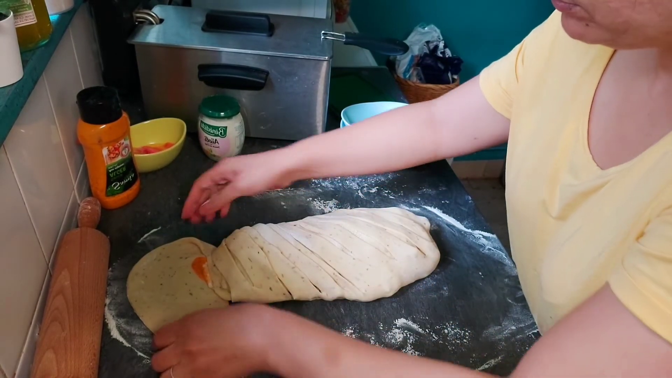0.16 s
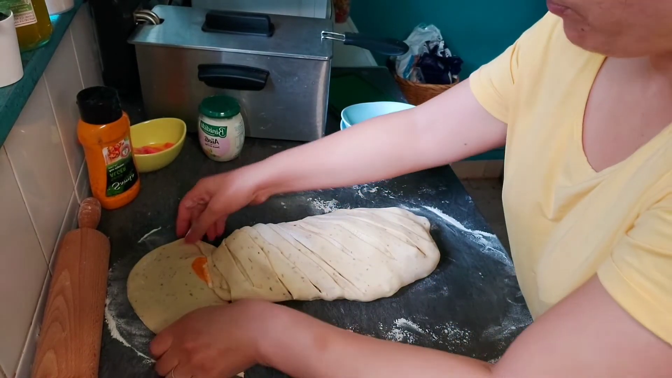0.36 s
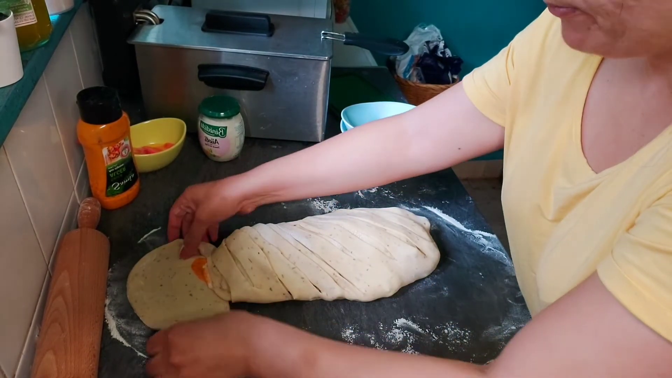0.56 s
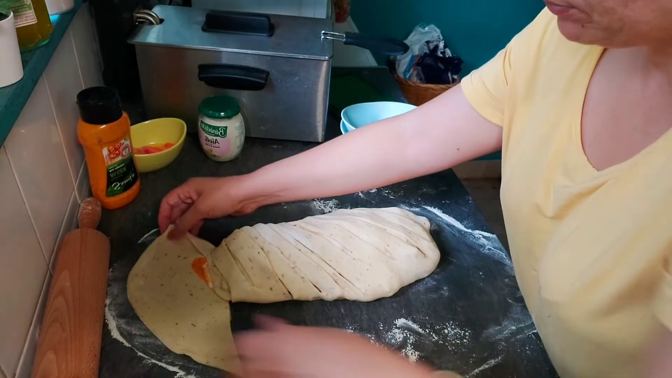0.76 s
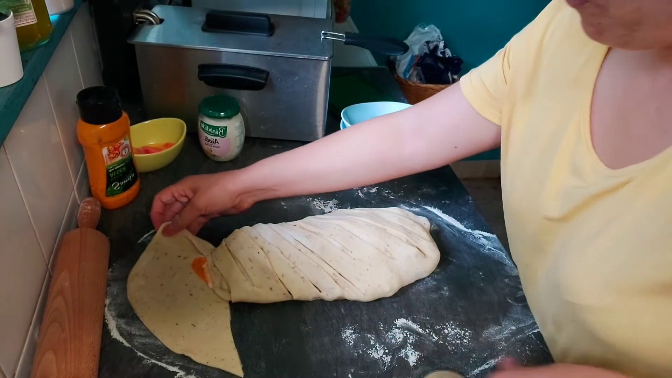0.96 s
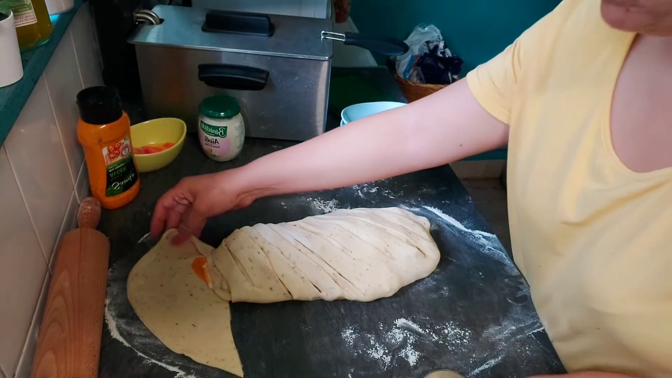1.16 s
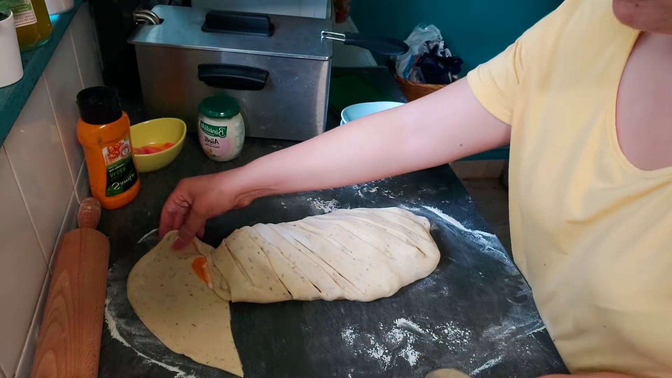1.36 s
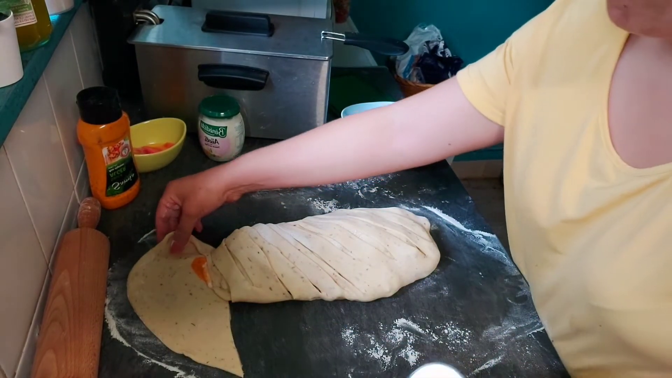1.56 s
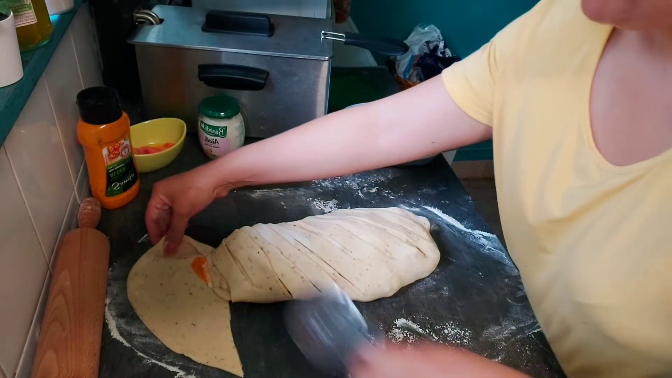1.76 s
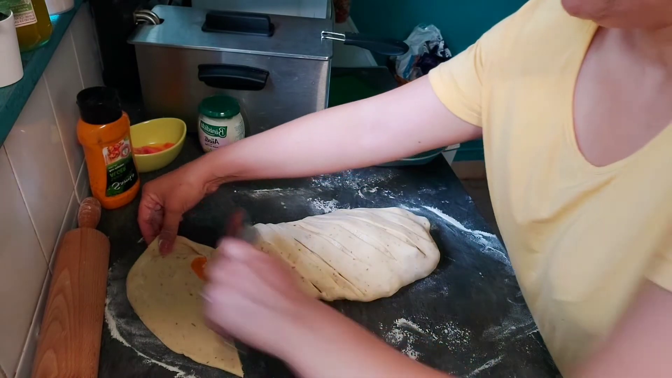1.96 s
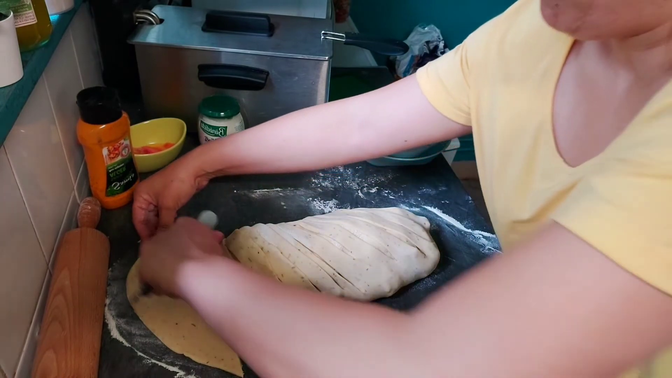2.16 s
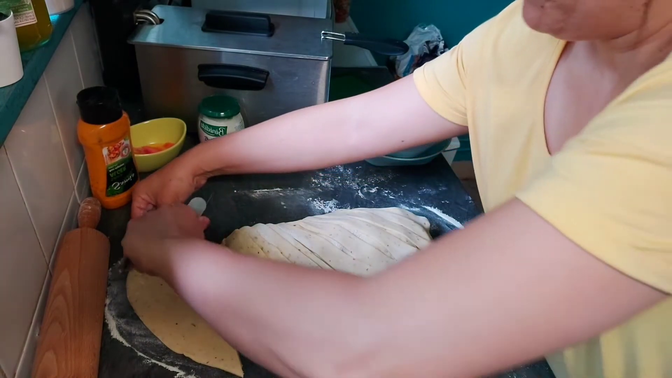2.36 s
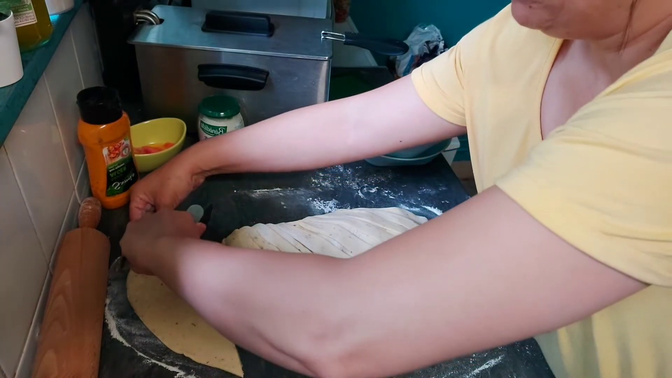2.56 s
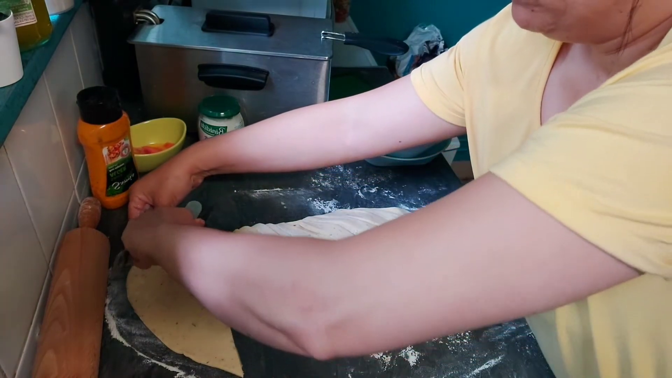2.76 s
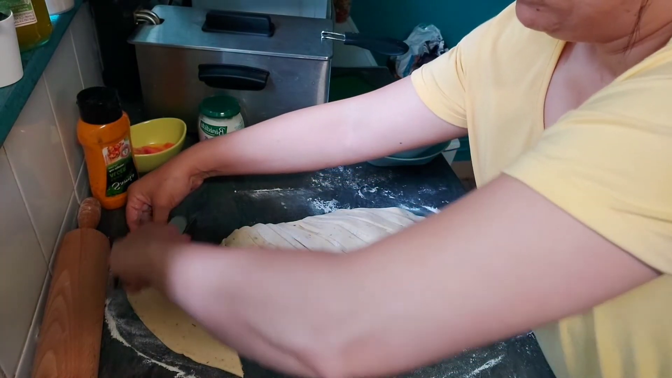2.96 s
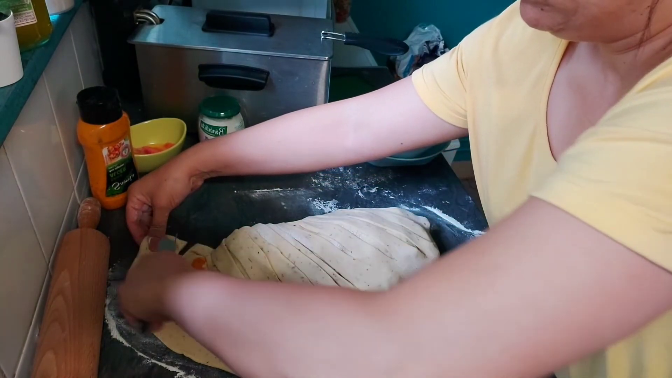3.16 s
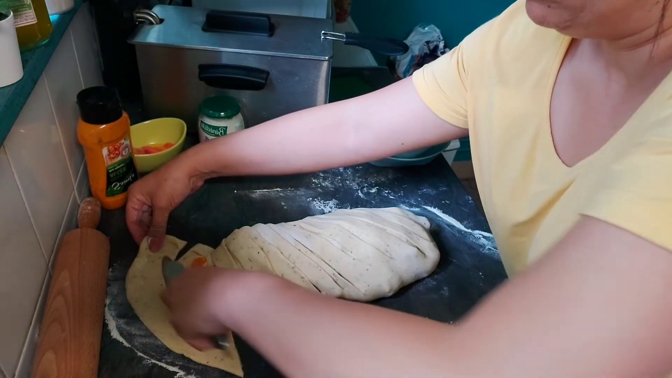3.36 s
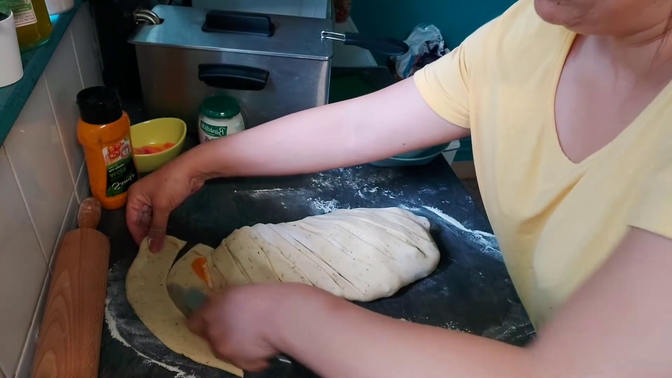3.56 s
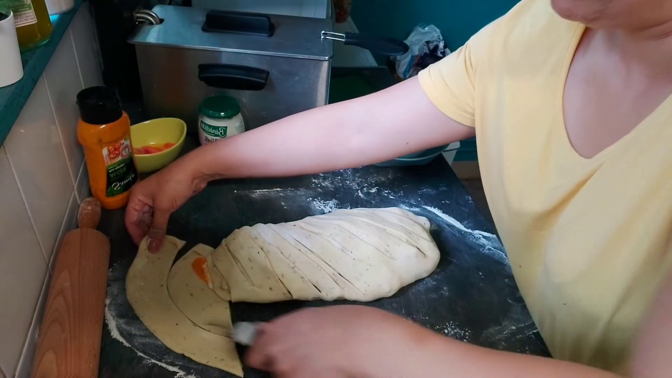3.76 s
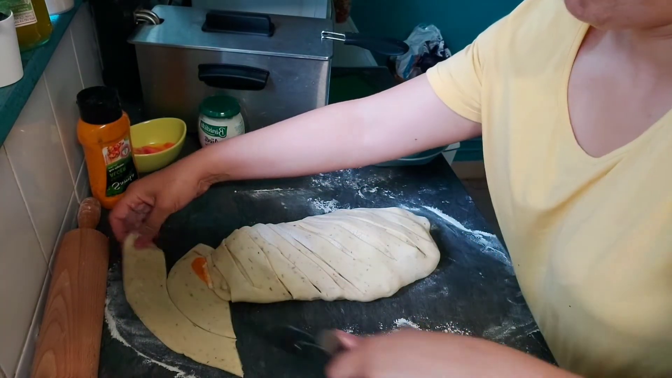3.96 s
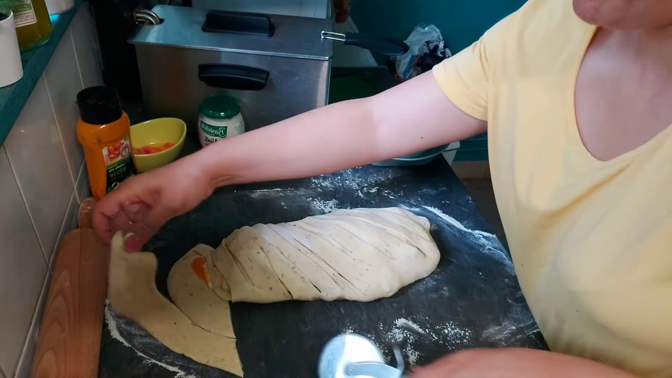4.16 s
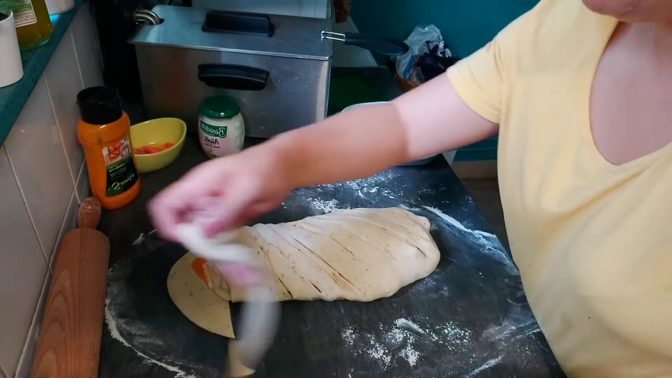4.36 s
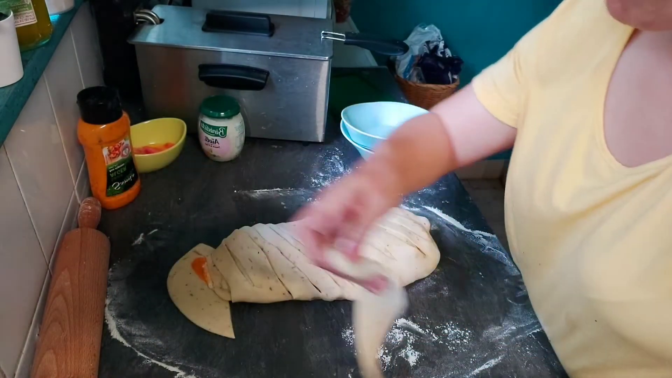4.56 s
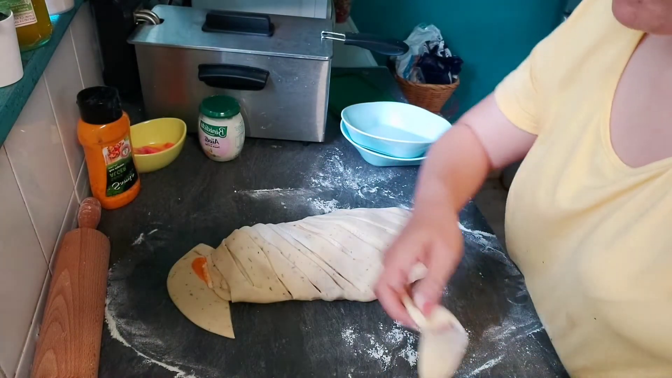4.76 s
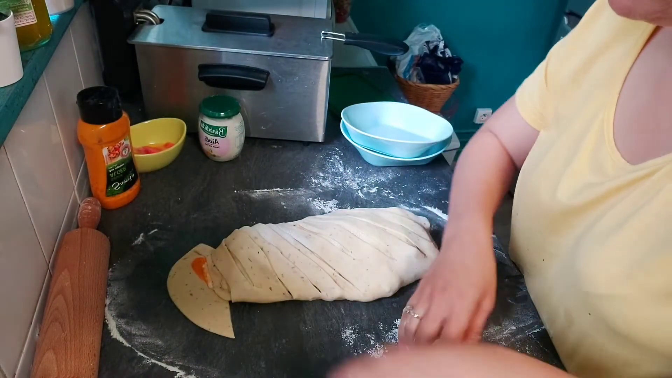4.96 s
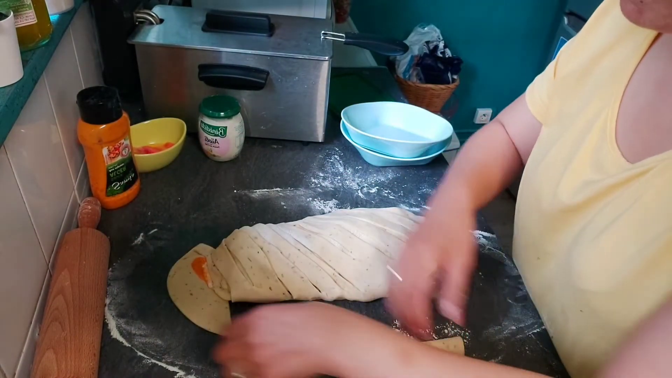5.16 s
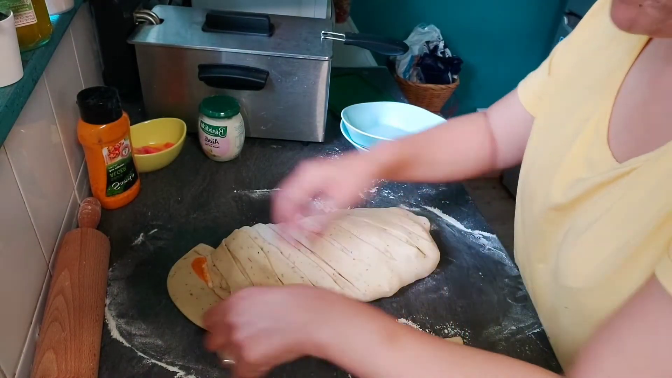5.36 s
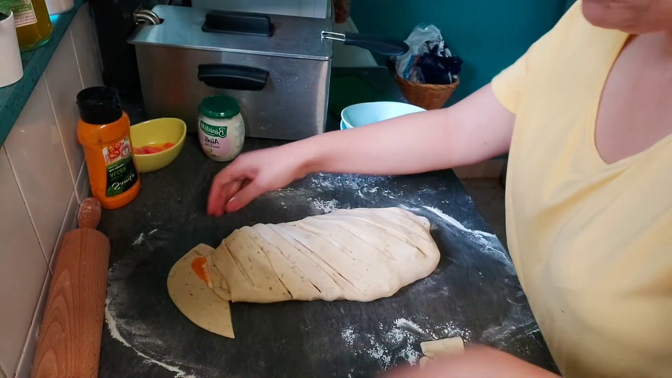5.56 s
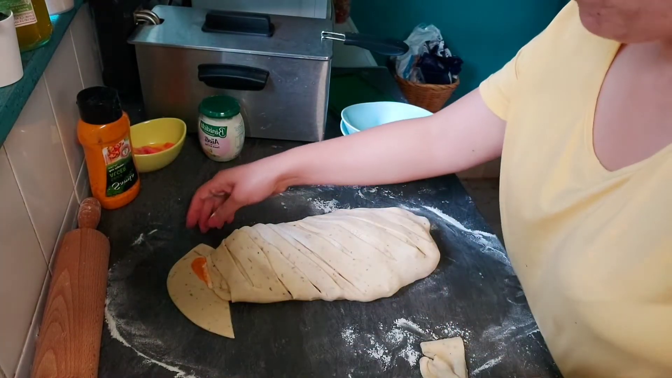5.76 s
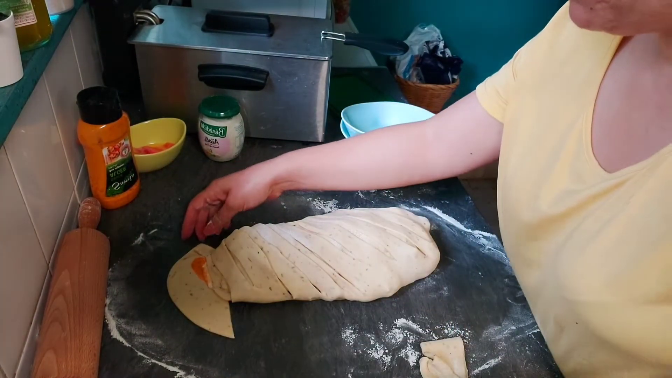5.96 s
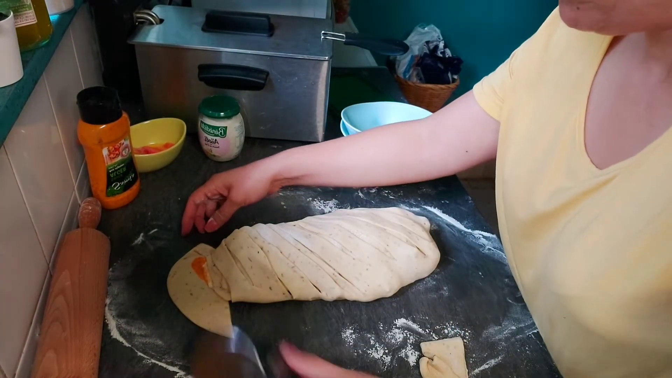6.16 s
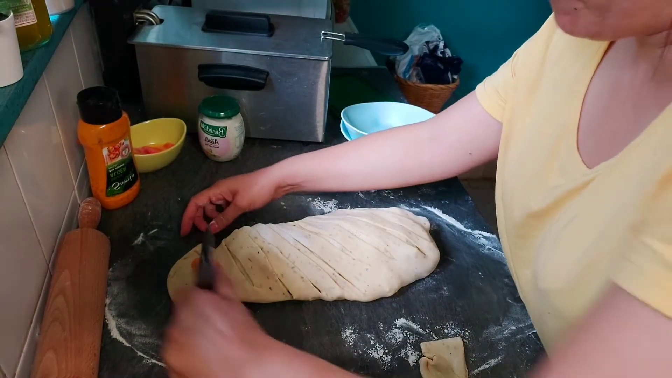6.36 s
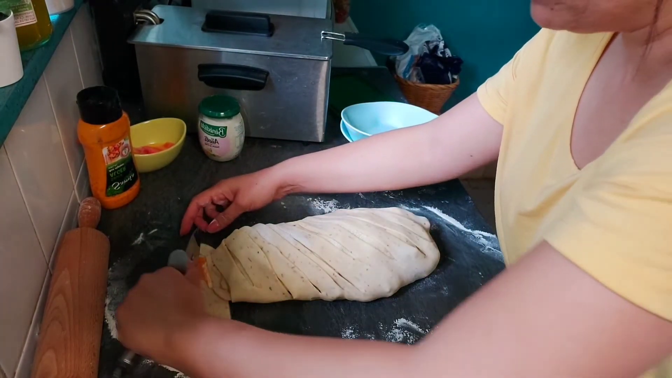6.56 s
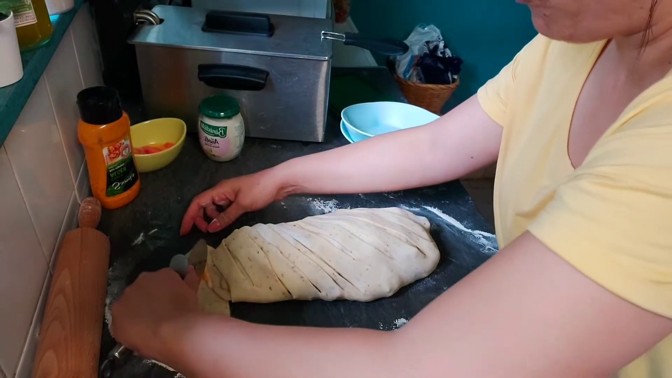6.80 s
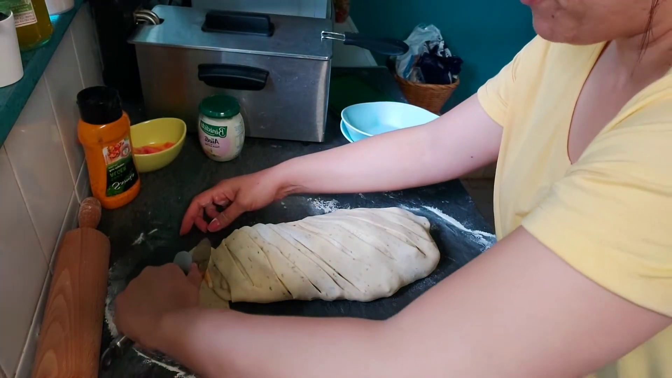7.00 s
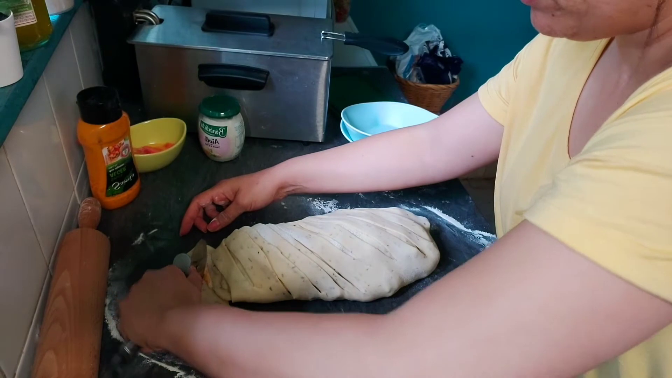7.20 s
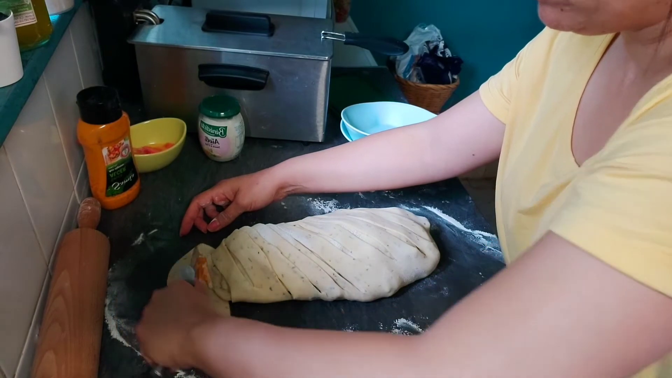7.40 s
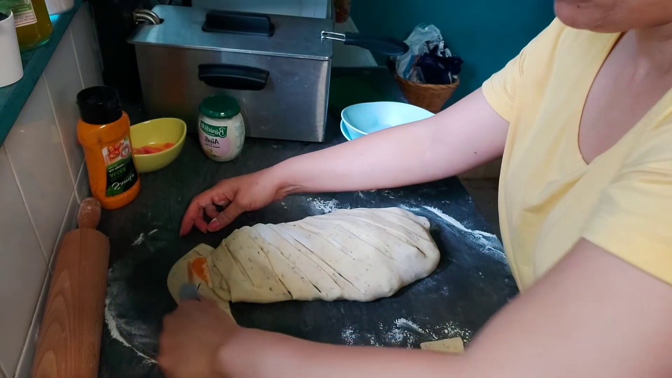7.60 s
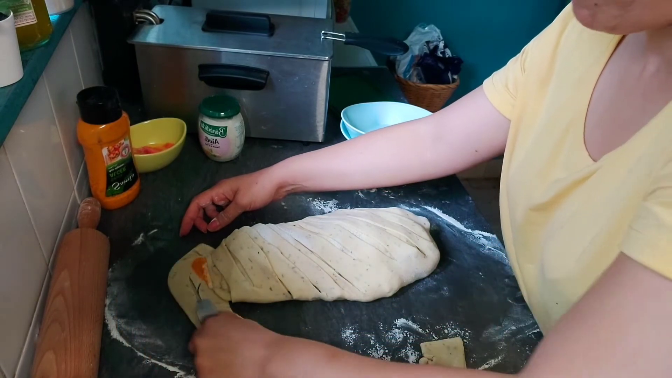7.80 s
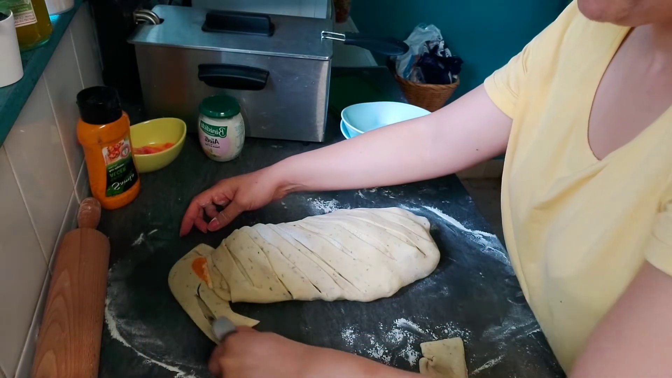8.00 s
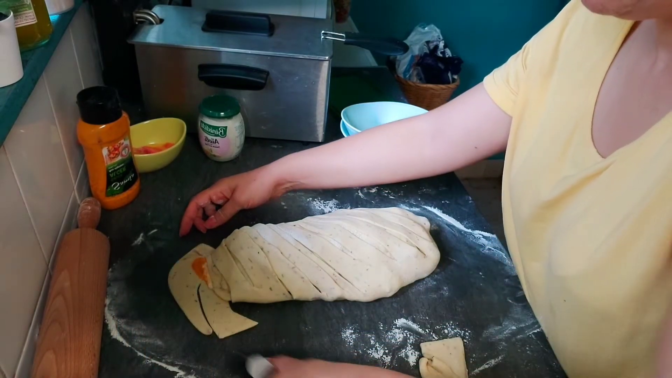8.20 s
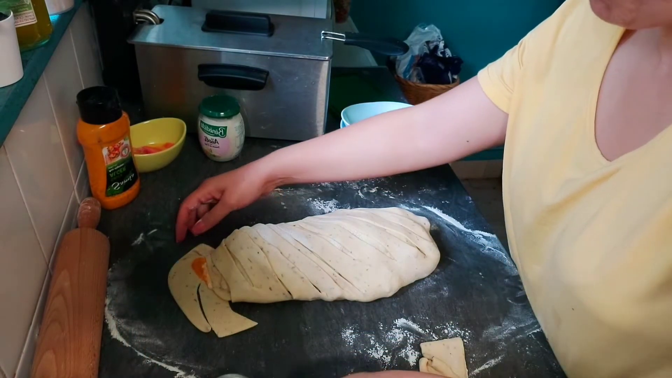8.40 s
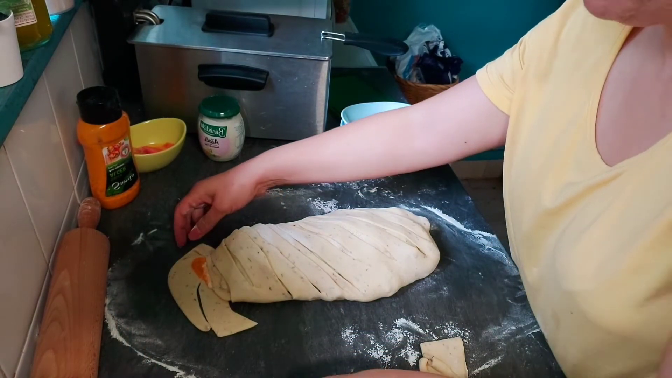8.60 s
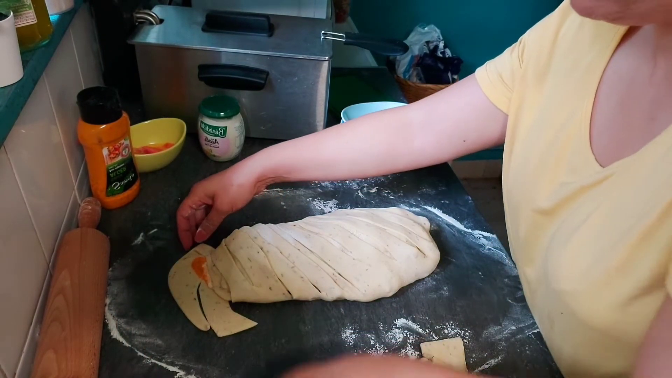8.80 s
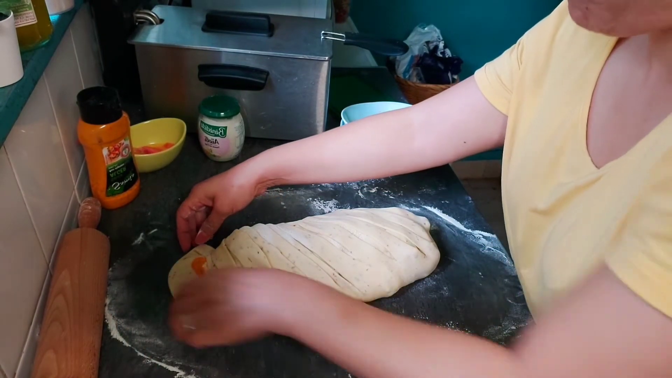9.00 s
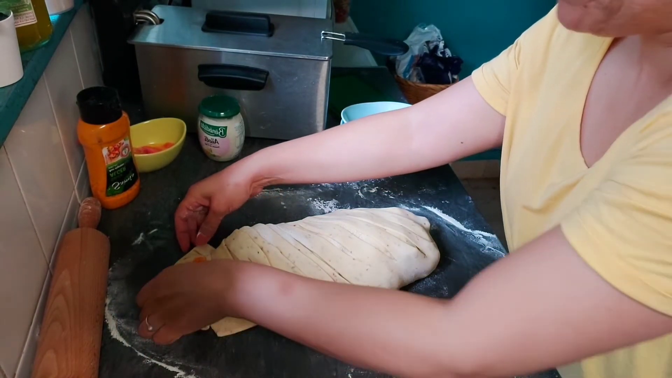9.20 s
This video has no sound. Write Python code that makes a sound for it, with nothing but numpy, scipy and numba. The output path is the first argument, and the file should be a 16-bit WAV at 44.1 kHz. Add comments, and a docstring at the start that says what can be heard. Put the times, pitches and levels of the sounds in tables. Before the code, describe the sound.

Close, hard metal knocks, light clinks and short rough rolling scrapes of a dough cutter on stone, over faint quick ticking and quiet kitchen hum.

```python
"""Cutting wheel in a tiled kitchen

A steel cutting wheel is picked up, rolled through dough and dropped on a stone counter in a small tiled kitchen.
Each contact is a burst of noise for the crack, and sets decaying tones going for the blade and the counter.
Rolling is rough noise in a sinking band; the loose disc chimes, and hard knocks thump in the cabinet below.
Far off, short fading puffs of noise make the ticks of a timer over a steady hum and hiss.
"""
import sys
import numpy as np
from scipy import signal
from scipy.fft import rfft, irfft, next_fast_len
from scipy.io import wavfile
from scipy.ndimage import uniform_filter1d
from numba import njit

SR = 44100
rng = np.random.default_rng(int(sys.argv[2]) if len(sys.argv) > 2 else 0)


def generate_wav(sig):
    """Save sig (samples, or channels by samples) to the path in sys.argv[1] as 16-bit PCM at SR."""
    pcm = np.round(np.clip(np.atleast_2d(sig).T, -1, 1) * 32767).astype(np.int16)
    wavfile.write(sys.argv[1], SR, pcm)


def ratio_of_db(decibels):
    """Turn decibels (scalar or array-like) into linear amplitude factors; 0 dB maps to 1."""
    return 10 ** (np.asarray(decibels, float) / 20)


N = 407660  # length in samples

# Spectrum of hum and hiss. Each row: frequency in Hz, relative level in dB per Hz.
HUM_SPECTRUM = [(30, -1), (95, 7), (182, -14.5), (332, -8), (673, -20), (1050, -19.5), (1085, -7),
                (1120, -14.5), (1400, -24), (3230, -30.5), (7260, -27.5), (10200, -38), (15500, -35)]
HUM_DB = -63  # rms

# Spectrum of a timer tick. Each row: frequency in Hz, relative level in dB per Hz.
TICK_SPECTRUM = [(2500, -22), (4200, -2), (7300, -0.5), (9500, -14.5), (12000, -47.5)]
TICK_FIRST_S, TICK_PERIOD_S = .122, .2716
TICK_NOISE_DB = -65  # rms of the noise from which the ticks are cut

# How long the room echoes. Each row: frequency in Hz, time to fade by 60 dB in seconds.
ROOM_T60 = [(100, 0.36), (12800, 0.33)]
ROOM_DB, EARLY_DB = 5, -0.5  # echoes over the direct sound; extra strength of the early ones
RIGHT_LAG_S, LEFT_DB = 0.0002357, -1.95  # average delay at the right port; left level over right
PATTERNS, PATTERN_S = 5, .23  # number of random echo patterns, seconds from one to the next

# Tones of the cabinet under the slab. Each row: frequency in Hz, relative level in dB, 60 dB fade time in seconds.
CABINET = [(52, 0, .45), (78, -6, .3)]
SHAKE_DB = -38  # drive of the cabinet for a thud of -13 dB

# Tones of the free disc, with 2, 3, .. nodal diameters: frequency in Hz.
DISC_HZ = [2498, 4294, 6492, 9071, 12005, 15290]
# The same tones in order. Each row: relative level in dB, 60 dB fade time in seconds.
DISC = [(-10.5, 3.9), (-5.5, 2.04), (-1.5, 1.4), (-5, 1.3), (0, 0.89), (-4.5, .3)]
# Blows on the disc's rim. Each row: start in seconds, level in dB, tilt in dB per octave,
# angle from the microphone in degrees.
CHIMES = [(1.573, -63, -13.5, 4), (1.884, -53.5, -0.5, 4), (2.102, -51.5, 4, 3.4), (4.795, -44.5, -1.5, 5),
          (5.992, -42, 2.5, 4.4), (8.8, -44.5, -8.5, 35), (9.116, -45.5, 10.5, 72)]
# Touches that stop the disc: time in seconds.
STOPS_S = [1.8, 2.05, 2.44, 5.85, 6.19, 9.3]

# Tones of the blade: frequency in Hz.
BLADE_HZ = [3912, 6702, 6795, 7350, 7475, 7654, 10150, 11330, 11465, 13980]
# The same tones in order. Each row: level in dB when lifted, level in dB when it meets the stone,
# 60 dB fade time in seconds.
BLADE = [(-10, -14.5, 0.21), (-12, -19.5, 0.41), (-9.5, -14, .28), (-22, -13, 0.02), (-31.5, -8.5, 0.087),
         (-19, -12, 0.066), (-10.5, -18, 0.17), (-12, -4.5, 0.074), (-11.5, -5.5, 0.28),
         (-11.5, -20.5, .14)]
# Tones of the stone counter. Each row: frequency in Hz, relative level in dB, 60 dB fade time in seconds.
COUNTER = [(126.8, -19.5, 0.39), (202, -19.5, 0.3), (288.4, -3.5, 0.097), (397.1, -5.5, 0.024),
           (611, -6, 0.027), (714, -15, 0.086), (1015, 9, 0.0022), (1357, -11, 0.044)]

# Spectrum of the crack of a contact. Each row: frequency in Hz, relative level in dB per Hz.
CRACK_SPECTRUM = [(300, -46), (1200, -18), (1650, -0.5), (3500, -0.5), (5400, -1), (6150, -6), (7000, -5.5),
                  (9500, -10.5), (11450, 5), (12600, -6), (14000, -18.5), (16000, -26.5)]
# Knocks of the wheel on the counter. Each row: start in seconds, crack level in dB, thud level in dB,
# crack tilt in dB per octave, blade ring in dB over the crack.
KNOCKS = [(1.24, -26.5, -24, -1, -26.5), (1.2588, -31, -21, -2.5, -14.5), (1.382, -19, -27.5, 0.5, -7.5),
          (1.392, -13.5, -20.5, 2, -21), (1.4822, -25.5, -25.5, -3.5, -6), (1.5205, -22, -26, 2, -31),
          (3.5281, -26.5, -26, 2, -12), (3.545, -29.5, -32, 22, -31), (3.721, -34.5, -45.5, 0.5, -22),
          (4.3779, -27, -29.5, -5, 1), (4.397, -9.5, -20, -1.5, -9.5), (4.403, -9.5, -18.5, 7.5, 3),
          (4.474, -12, -13.5, -10.5, -26.5), (4.6536, -14, -20.5, 3, -0.5), (4.757, -20.5, -23.5, 4, -0.5),
          (4.795, -16, -7.5, 1, -1.5), (4.813, -15.5, -16, 1, 3), (5.7512, -24, -20, -3.5, -3),
          (5.8237, -31.5, -26.5, -4, -16.5), (5.851, -12.5, -17, 1.5, -7), (5.868, -13, -17, 2.5, -7.5),
          (5.955, -43, -30.5, -10.5, -12), (5.9895, -21, -39.5, 2.5, -4.5), (8.167, -19.5, -22, 1, -18.5),
          (8.591, -4.5, -12, 3, -7), (8.68, -16.5, -18, 1.5, -4.5), (8.7057, -15.5, -22.5, 2, -23),
          (8.745, -24.5, -22.5, 1, -4), (8.799, -13, -10.5, 14, -5), (9.08, -50, -34.5, -25, -13.5),
          (9.1152, -16, -21.5, 3.5, -11.5)]
# Clinks of the lifted wheel on its axle. Each row: start in seconds, crack level in dB,
# crack tilt in dB per octave, blade ring in dB over the crack.
CLINKS = [(1.505, -34, 9, 1.5), (1.5722, -20, 5, -2), (1.7943, -22.5, 5, -5.5), (1.8755, -37.5, 3.5, 8),
          (2.037, -31, 5, -34), (2.1, -30, 8.5, -6.5), (2.603, -40.5, -4, -32), (3.8012, -26.5, 2.5, -26),
          (3.9564, -42.5, 1.5, -23), (3.9986, -39.5, 1.5, -10.5), (4.25, -53.5, -2, -18),
          (4.357, -40.5, -4, -13), (6.0178, -23, 6, -3.5), (6.2317, -39, -10, 13), (6.258, -26.5, 3, -1.5),
          (6.342, -25, 0.5, 5), (6.425, -34, 2, -19), (8.19, -23.5, 9, -6.5), (8.3595, -37.5, 1, -6),
          (8.4133, -24.5, 0.5, 6.5), (8.524, -24.5, 2.5, -4), (8.82, -13.5, 3, -29)]
RATTLE_MS, DB_PER_HALVING = 4.22, 51.5  # decay time of a -20 dB crack; this much harder halves it
BUMP_DB, BUMP_OCT = 2.5, .4  # size and spacing of random bumps in a crack's spectrum

# Strokes of rolling and sliding. Each row: first centre of the rumble in Hz, then the pressure curve
# as pairs of time in seconds and relative rumble level in dB.
ROLL = [(470, [(.2, -79), (.31, -55.5), (.4, -54), (.5, -104)]), (650, [(.93, -73), (1.0, -58.5),
        (1.07, -86.5)]), (800, [(2.585, -53), (2.6, -42.5), (2.65, -36), (2.715, -48), (2.755, -47),
        (2.82, -100)]), (329, [(3.02, -64.5), (3.05, -53), (3.1, -99)]), (666, [(3.22, -67), (3.5, -57),
        (3.56, -40.5), (3.7, -49.5), (3.74, -34.5)]), (315, [(3.74, -47), (3.79, -32.5), (3.85, -78)]),
        (390, [(5.55, -72), (5.58, -45), (5.61, -80), (5.65, -47), (5.7, -48), (5.75, -38.5)]),
        (926, [(7.28, -72.5), (7.36, -54), (7.58, -44.5), (7.8, -52), (7.9, -44.5), (7.97, -56),
        (8.01, -42.5), (8.12, -34.5), (8.17, -27), (8.22, -47.5), (8.32, -94.5)])]
SINK_OCT_PER_S, GRIT_DB = 1.5, -12.5  # sinking of the rumble along a stroke; grit under the roughness


def level(x, db):
    """Scale to an rms level."""
    return x * ratio_of_db(db) / np.sqrt(np.mean(x ** 2))


def on_log_hz(hz, table):
    """Read a (Hz, value) table on a log-frequency axis."""
    table_hz, value = np.transpose(table)
    return np.interp(np.log(hz + 1), np.log(table_hz), value)


def colour(x, table):
    """Give noise a spectrum of (Hz, dB) points."""
    n = x.shape[-1]
    gain = ratio_of_db(on_log_hz(np.fft.rfftfreq(n, 1 / SR), table))
    return irfft(rfft(x) * gain, n)


def grit(scatter_db):
    """Dense clicks of uneven size, rms 1."""
    size = ratio_of_db(scatter_db * rng.exponential(size=N))
    return level(rng.standard_normal(N) * size, 0)


@njit
def moving_band(x, hz, share):
    """State-variable band-pass with a moving centre; share = width / centre."""
    y, b, l = np.empty(len(x)), 0., 0.
    for i in range(len(x)):
        g = np.tan(np.pi * hz[i] / SR)
        v = (b + g * (x[i] - l)) / (1 + g * (g + share))
        b, l, y[i] = 2 * v - b, l + 2 * g * v, share * v
    return y


@njit
def mode(x, gain, pole, which):
    """One decaying tone, a turning and shrinking pointer whose gain and pole change from contact to contact."""
    y, z = np.empty(len(x)), 0j
    for i in range(len(x)):
        z = z * pole[which[i]] + gain[which[i]] * x[i] + 1e-18
        y[i] = z.imag
    return y


def ring(x, modes, spot, detune, which):
    """Sum of modes; spot and detune give each mode a gain and pitch factor per contact, which names the contact."""
    total = 0
    for (hz, db, t60), gain, pitch in zip(modes, spot, detune):
        pole = np.exp((2j * np.pi * hz * pitch - np.log(1000) / t60) / SR)
        total = total + mode(x, ratio_of_db(db) * gain, pole, which)
    return total


def hum():
    """Appliance hum and microphone hiss as shaped noise; the bass is nearly the same left and right."""
    mid, side = colour(rng.standard_normal((2, N)), HUM_SPECTRUM)
    side = colour(side, [(100, -15.5), (400, -2.5), (1000, 0.5)])
    return level(mid + side * np.array([[1], [-1]]), HUM_DB)


def timer():
    """Regular soft ticks from across the kitchen, each a fading puff of noise like an echo."""
    beats = np.zeros(N)
    at = (np.arange(TICK_FIRST_S, N / SR, TICK_PERIOD_S) * SR).astype(int)
    beats[at] = ratio_of_db(1.5 * rng.standard_normal(len(at)))  # uneven strength
    fade = signal.lfilter([1], [1, -np.exp(-1 / (.04 * SR))], beats)  # decay time .04 s
    return fade * level(colour(rng.standard_normal((2, N)), TICK_SPECTRUM), TICK_NOISE_DB)


def room(x):
    """Five random echo patterns, each with its own lag to the right port, fade into one another in turn,
    so the echo does not colour every tone alike."""
    t = np.arange(SR // 2) / SR
    mid, side = rng.standard_normal((2, PATTERNS, 1, len(t)))
    tail = 0
    for hz in 62.5 * 2. ** np.arange(9):
        edges = [hz / np.sqrt(2), min(hz * np.sqrt(2), .45 * SR)]
        octave = signal.butter(2, edges, "band", fs=SR, output="sos")
        # left and right echoes differ more towards the treble
        pair = mid + min((hz / 850.) ** 2, 1) * side * np.array([[1], [-1]])
        # the near slab masks the room in the bass
        bass_gain = min(hz / 337.0, 1) ** 0.39
        decay = np.exp(-np.log(1000) * t / on_log_hz(hz, ROOM_T60))
        tail = tail + bass_gain * signal.sosfilt(octave, pair) * decay
    # counter, tiles and nearby jars answer within a few ms
    tail = tail * (1 - np.exp(-(t / 0.005) ** 2)) * (1 + ratio_of_db(EARLY_DB) * np.exp(-t / 0.0083))
    tail = ratio_of_db(ROOM_DB) * tail / np.sqrt(np.mean(np.sum(tail ** 2, axis=-1)))
    # the direct sound, later at the right port
    tail[:, 0, 0] += 1
    lag = (RIGHT_LAG_S * SR * np.linspace(.3, 1.7, PATTERNS)).astype(int)
    tail[np.arange(PATTERNS), 1, lag] += 1
    # fade from each pattern to the next, round and round
    turn = np.arange(N) / SR / PATTERN_S
    out = 0
    for k in range(PATTERNS):
        distance = np.abs((turn - k + PATTERNS / 2) % PATTERNS - PATTERNS / 2)
        share = np.maximum(1 - distance, 0)
        out = out + signal.oaconvolve((x * share)[None], tail[k], axes=1)[:, :N]
    return out * ratio_of_db([[LEFT_DB / 2], [-LEFT_DB / 2]])


def cabinet():
    """A deep thump, the same left and right, that grows with the square of the knock."""
    push = np.zeros(N)
    for s, _, thud_db, _, _ in KNOCKS:
        push[int(s * SR)] = ratio_of_db(SHAKE_DB + 2 * (thud_db + 13))
    same = np.ones((len(CABINET), 1))
    return ring(push, CABINET, same, same, np.zeros(N, np.int64))


def disc():
    """Clear chimes of the loose disc, cut short by a touch; each tone is a quarter cycle apart at the two ports."""
    out = np.zeros((2, N))
    hz, mode_db, t60 = np.c_[DISC_HZ, DISC].T[:, :, None]
    diameters = (2 + np.arange(len(DISC)))[:, None]
    phases = rng.random((len(CHIMES), len(DISC), 1))  # in cycles
    apart = np.array([0, .25])[:, None, None]
    for (s, db, tilt_db, angle), phase in zip(CHIMES, phases):
        stop_s = STOPS_S[np.searchsorted(STOPS_S, s)]
        i = int(s * SR)
        t = np.arange(min(int((stop_s - s + .1) * SR), N - i)) / SR
        swell = 1 - np.exp(-t / .01)
        touch = np.exp(-np.maximum(t - stop_s + s, 0) / .06)
        fade = ratio_of_db(db + mode_db + tilt_db * np.log2(hz / 5000) - 60 * t / t60)
        # a nodal line towards the microphone mutes a mode
        fade = fade * np.cos(np.radians(angle) * diameters)
        tones = np.sin(2 * np.pi * (hz * t + phase + apart))
        out[:, i:i + len(t)] += swell * touch * np.sum(fade * tones, axis=1)
    return out


def touches():
    """Knocks and clinks in order of time; a clink does not push the counter."""
    clinks = [(s, db, -np.inf, tilt_db, ring_db) for s, db, tilt_db, ring_db in CLINKS]
    return sorted(KNOCKS + clinks)


def contacts():
    """Each contact is a short rattle of micro-impacts: a crack in the air, a blow on the blade, a push on the counter."""
    crack, strike, push = np.zeros(N), np.zeros(N), np.zeros(N)
    t = np.arange(4096) / SR
    hz = np.fft.rfftfreq(len(t), 1 / SR)
    rattle = grit(3.)
    # each contact meets steel and stone at another spot, so its spectrum has its own bumps
    knots = 500 * 2 ** np.arange(0, 5.2, BUMP_OCT)
    bumps = BUMP_DB * rng.standard_normal((len(touches()), len(knots)))
    for (s, crack_db, thud_db, tilt_db, ring_db), bump in zip(touches(), bumps):
        i = int(s * SR)
        n = min(len(t), N - i)
        # harder contacts are shorter
        tau = RATTLE_MS / 1000 * 2 ** (-(crack_db + 20) / DB_PER_HALVING)
        envelope = (1 - np.exp(-t[:n] / (0.54 * tau))) ** 2 * np.exp(-t[:n] / tau)
        burst = envelope * rattle[i:i + n]
        burst = burst / np.sqrt(np.sum(burst ** 2))
        spectrum = rfft(burst, len(t))

        tilt = tilt_db * np.log2(np.maximum(hz, 500) / 5000)
        shape = ratio_of_db(on_log_hz(hz, CRACK_SPECTRUM) + on_log_hz(hz, np.c_[knots, bump]) + tilt)
        shape = shape / np.sqrt(np.mean(shape ** 2))
        crack[i:i + n] += ratio_of_db(crack_db) * np.sqrt(tau * SR) * irfft(spectrum * shape)[:n]

        # the force lasts about as long as the rattle and feeds every mode about equally
        force = irfft(spectrum / np.abs(spectrum))[:n] * np.exp(-(t[:n] / (4 * tau)) ** 2)
        strike[i:i + n] += ratio_of_db(crack_db + ring_db) * force
        push[i:i + n] += ratio_of_db(thud_db) * force
    return crack, strike, push


def rolling():
    """The wheel grinds over flour: rumble in a moving band and grit in the air, forces on blade and counter."""
    t = np.arange(N) / SR
    pressure, centre = np.zeros(N), np.full(N, 1. * ROLL[0][0])
    for hz, stroke in ROLL:
        at_s, db = np.transpose(stroke)
        late = t >= at_s[0]
        since = np.minimum(t[late], at_s[-1]) - at_s[0]
        centre[late] = hz * 2 ** (-SINK_OCT_PER_S * since)
        pressure += ratio_of_db(np.interp(t, at_s, db, left=-120, right=-120))
    rough = uniform_filter1d(pressure, size=150) * grit(2.2)
    # the dough grips and lets go unevenly, up to about 30 times a second
    grip = level(colour(rng.standard_normal(N), [(30, 0), (100, -30)]), 0)
    rough = rough * ratio_of_db(4 * grip)
    gritty = rough * ratio_of_db(GRIT_DB)
    rumble = ratio_of_db(11.5) * moving_band(moving_band(rough, centre, 0.97), centre, 0.97)
    hiss = ratio_of_db(7.5) * colour(gritty, [(1200, -2.5), (2700, -11.5), (7400, -11.5), (12000, -22.5)])
    strike = ratio_of_db(-39.0) * gritty
    # only firm pressure reaches the slab through the dough
    push = ratio_of_db(4.0) * rough * pressure
    return rumble + hiss, strike, push


def wheel():
    """Contacts and rolling together set blade and counter ringing; each contact meets and loads them at another spot."""
    air, strike, push = np.add(contacts(), rolling())
    events = np.array(touches())
    which = np.searchsorted(events[1:, 0], np.arange(N) / SR, "right")
    draws = rng.standard_normal((len(events), 2, len(BLADE) + len(COUNTER)))
    spot, shift = draws.transpose(1, 2, 0)
    # the light blade hardly sounds below its first mode, nor does the heavy slab
    strike = signal.sosfilt(signal.butter(2, 2500., "high", fs=SR, output="sos"), strike)
    push = signal.sosfilt(signal.butter(3, 135., "high", fs=SR, output="sos"), push)
    lifted_db, stone_db, t60 = np.transpose(BLADE)
    # the stone holds some modes and drives others
    pressed = np.outer(stone_db - lifted_db, np.isfinite(events[:, 2]))
    blade_gain = ratio_of_db(2 * spot[:len(BLADE)] + pressed)
    blade = ring(strike, np.c_[BLADE_HZ, lifted_db, t60], blade_gain, 1 + .001 * shift, which)
    slab_gain = ratio_of_db(4 * spot[len(BLADE):])
    slab = ring(push, COUNTER, slab_gain, 1 + .035 * shift[len(BLADE):], which)
    # the blade's thin tones come mostly straight, a quarter cycle apart at the two ports
    ports = signal.hilbert(blade, next_fast_len(N))[:N]
    return room(air + slab + ratio_of_db(-11.0) * blade) + np.array([ports.real, ports.imag])


def scene():
    """Wheel and counter in the room, timer and hum behind."""
    return wheel() + disc() + cabinet() + timer() + hum()


def low_pass(x):
    """Removes everything above the highest recorded frequency."""
    return signal.sosfilt(signal.butter(12, 17000, fs=SR, output="sos"), x)


def record(dry):
    """The microphone drops the deep bass; the phone rounds the loudest peaks and cuts the top."""
    x = signal.sosfilt(signal.butter(2, 70., "high", fs=SR, output="sos"), dry)
    rounded = np.tanh(x)
    mix = signal.sosfilt(signal.ellip(8, .2, 70, 15750, fs=SR, output="sos"), rounded)
    return low_pass(mix)


dry = scene()
out = record(dry)
generate_wav(out)
```